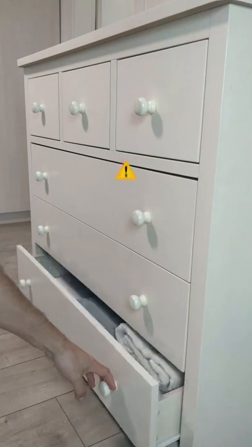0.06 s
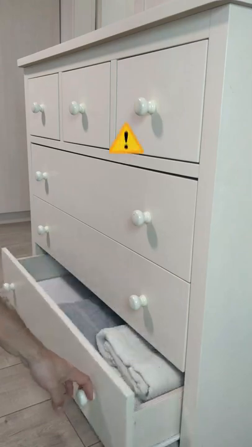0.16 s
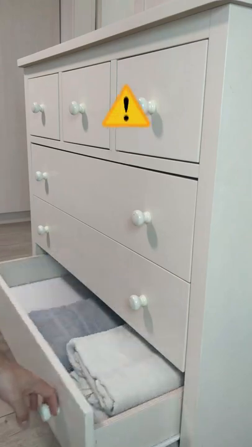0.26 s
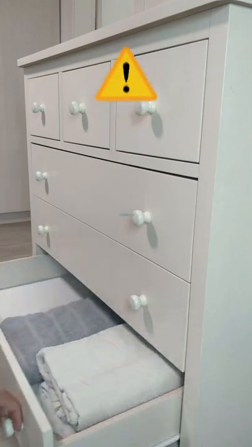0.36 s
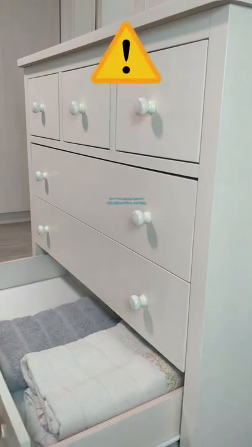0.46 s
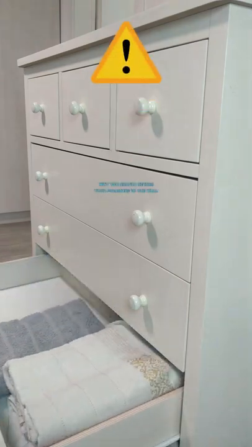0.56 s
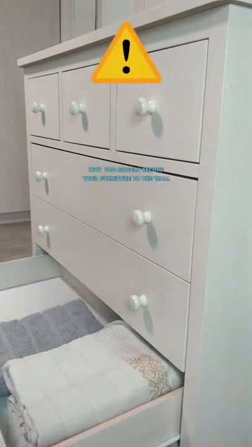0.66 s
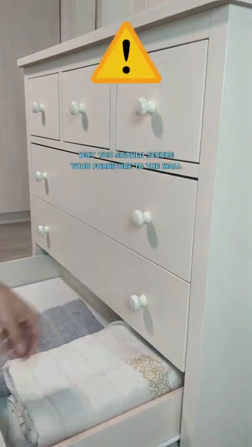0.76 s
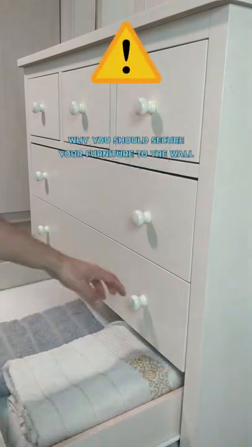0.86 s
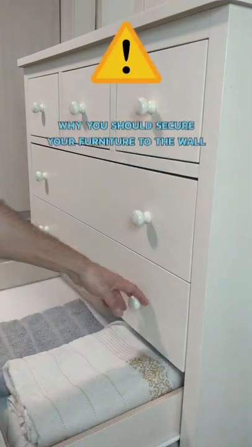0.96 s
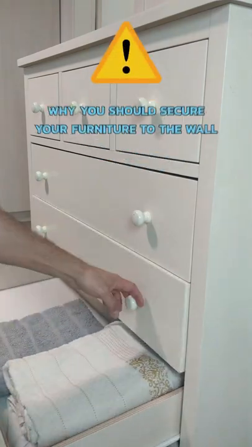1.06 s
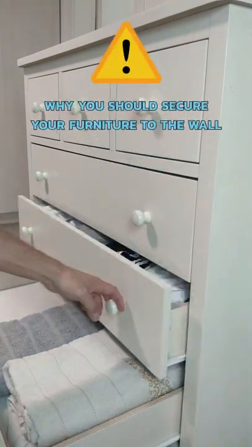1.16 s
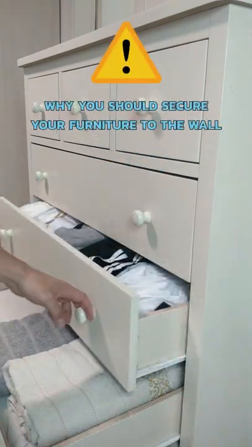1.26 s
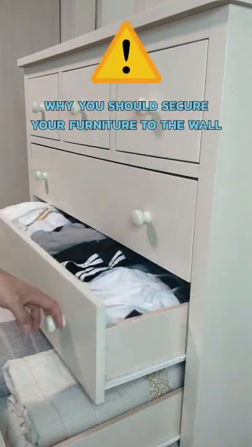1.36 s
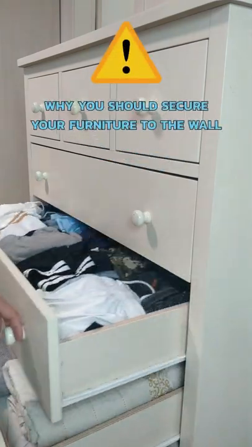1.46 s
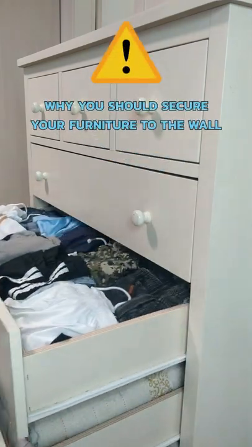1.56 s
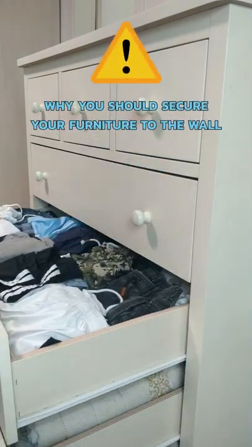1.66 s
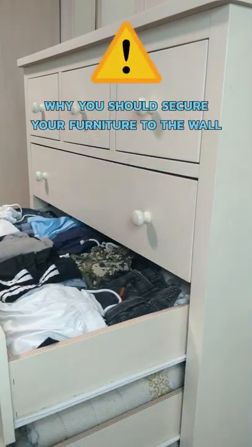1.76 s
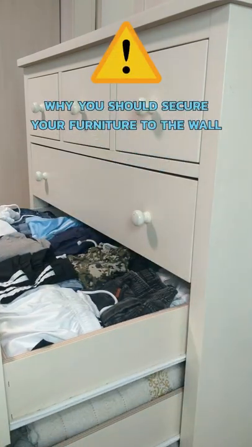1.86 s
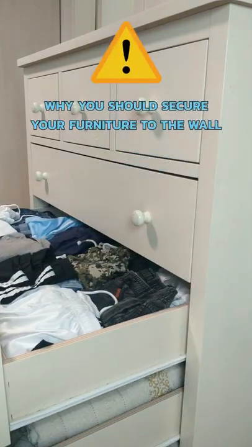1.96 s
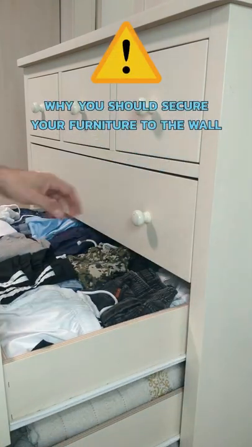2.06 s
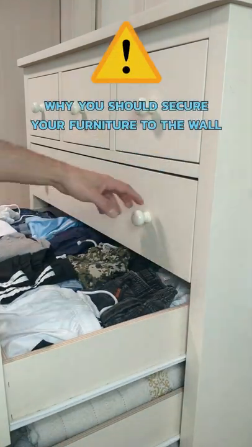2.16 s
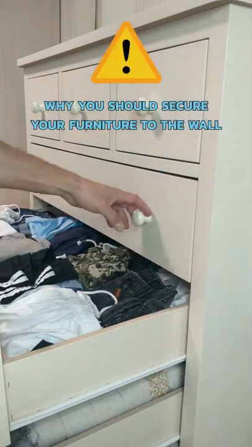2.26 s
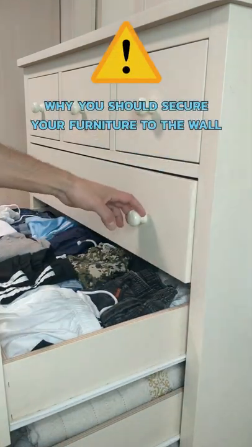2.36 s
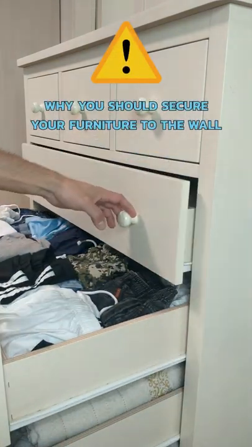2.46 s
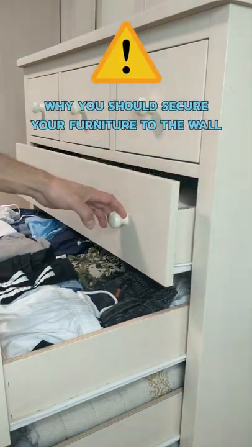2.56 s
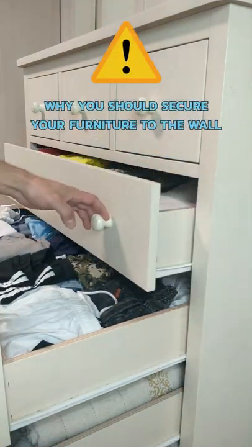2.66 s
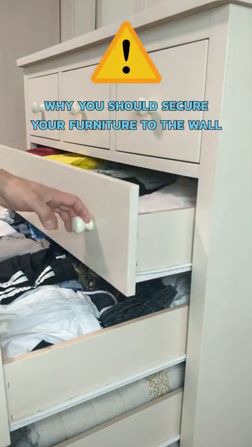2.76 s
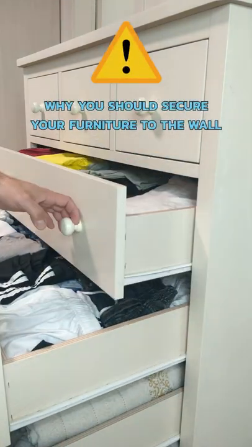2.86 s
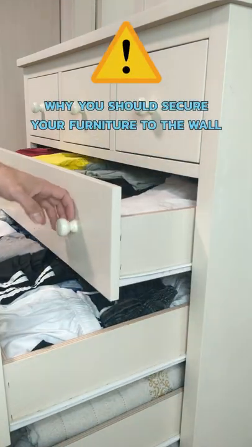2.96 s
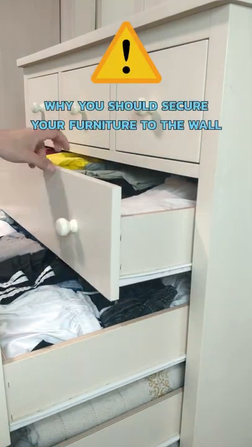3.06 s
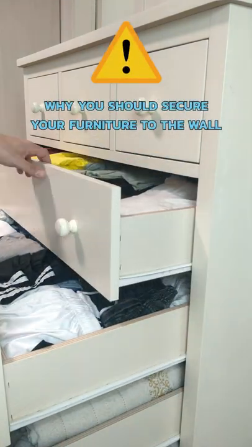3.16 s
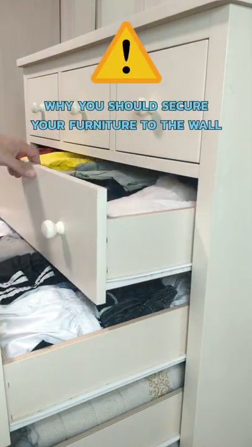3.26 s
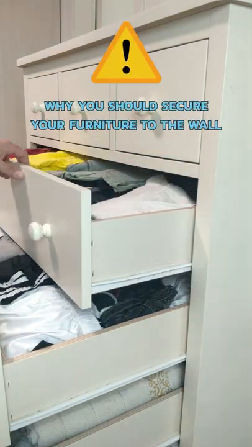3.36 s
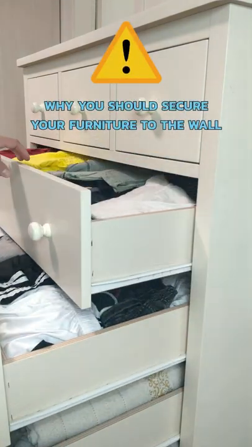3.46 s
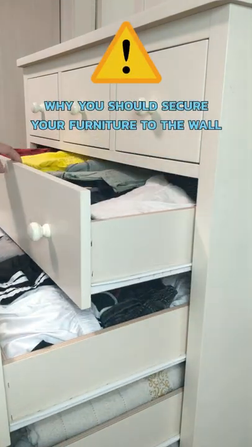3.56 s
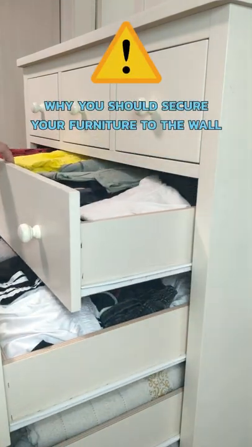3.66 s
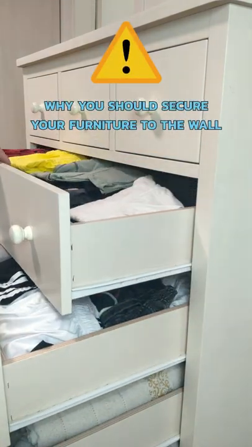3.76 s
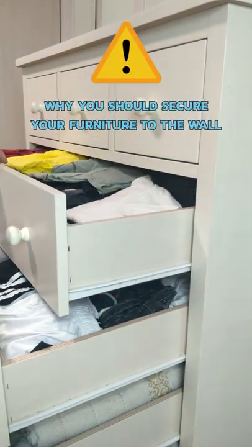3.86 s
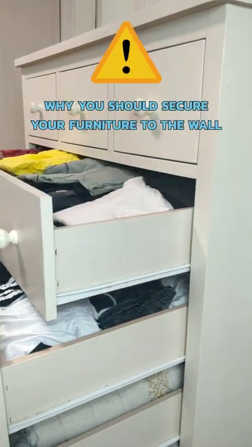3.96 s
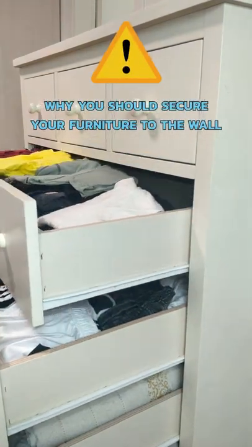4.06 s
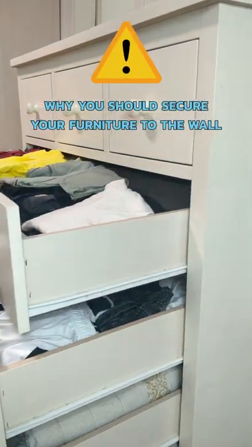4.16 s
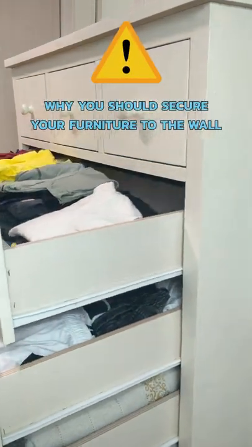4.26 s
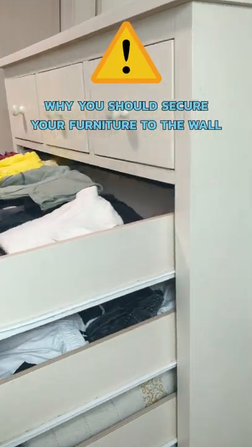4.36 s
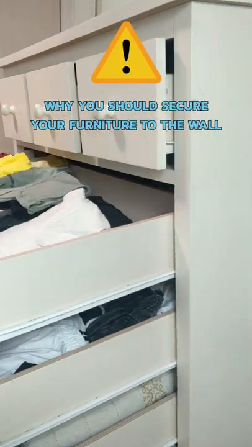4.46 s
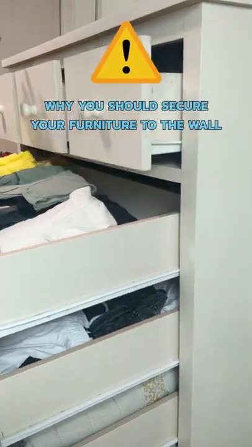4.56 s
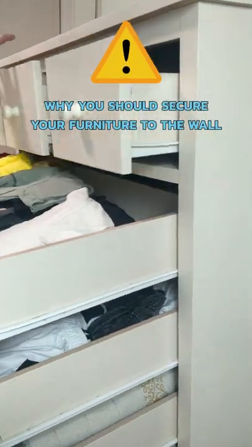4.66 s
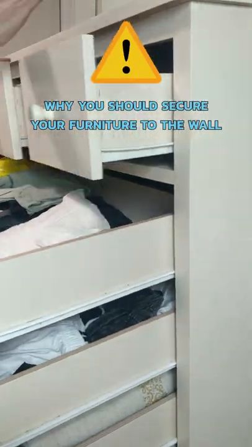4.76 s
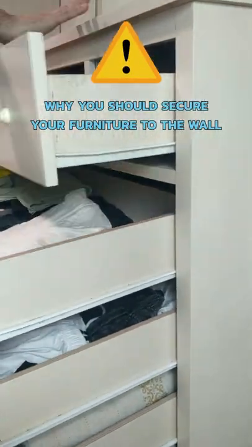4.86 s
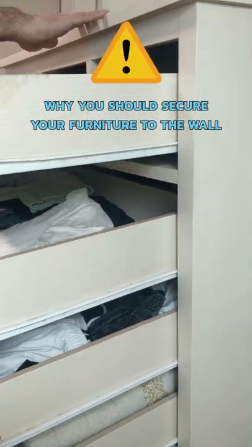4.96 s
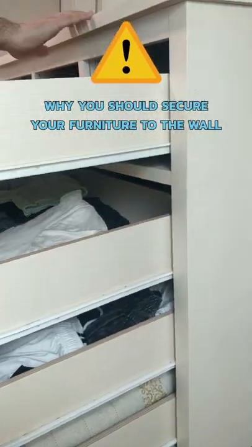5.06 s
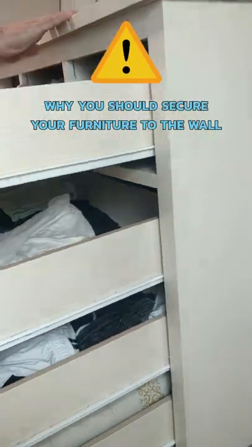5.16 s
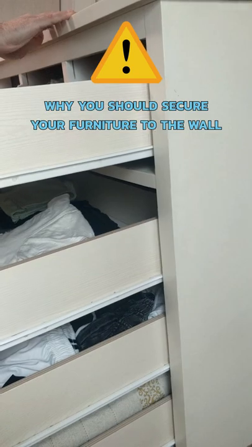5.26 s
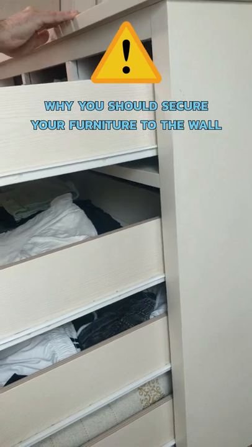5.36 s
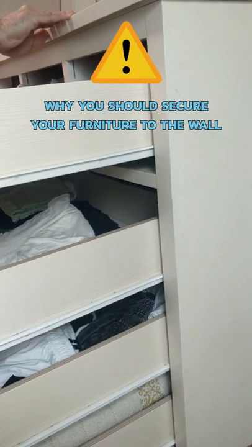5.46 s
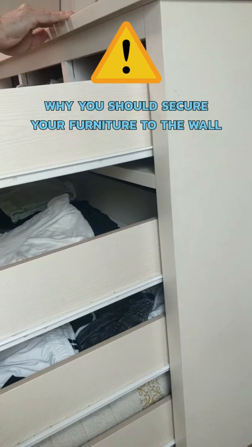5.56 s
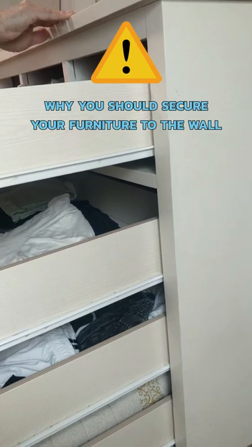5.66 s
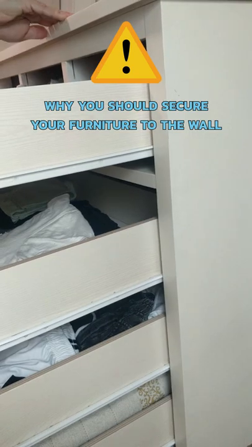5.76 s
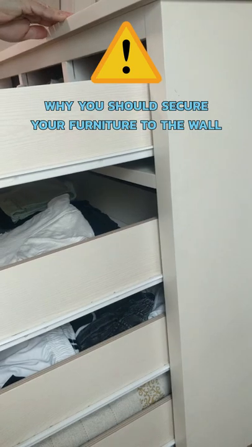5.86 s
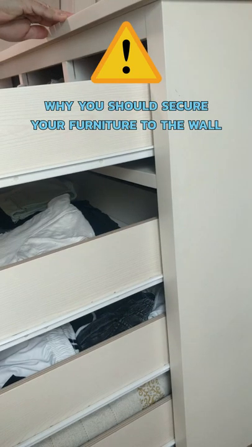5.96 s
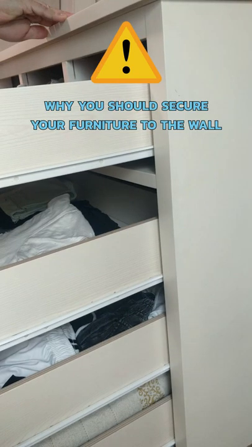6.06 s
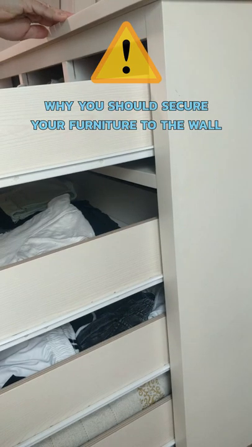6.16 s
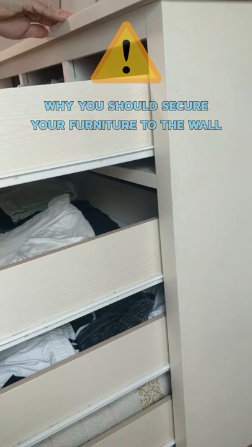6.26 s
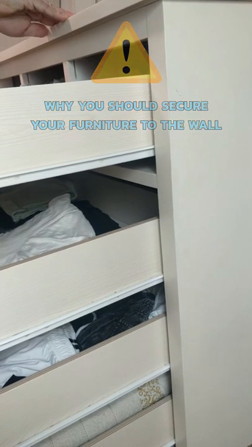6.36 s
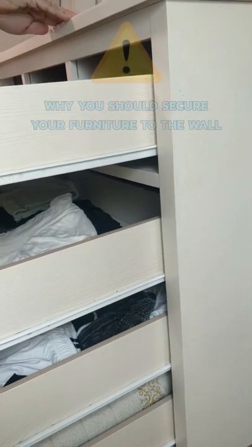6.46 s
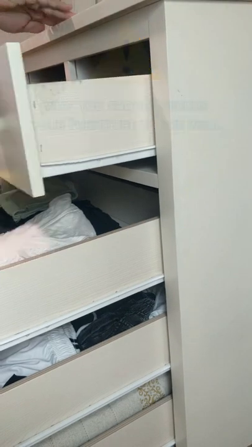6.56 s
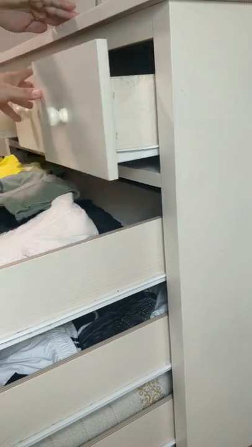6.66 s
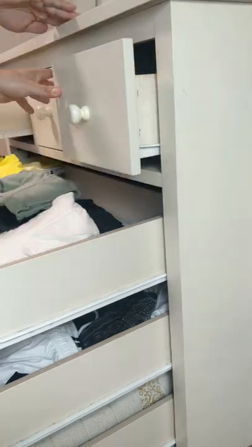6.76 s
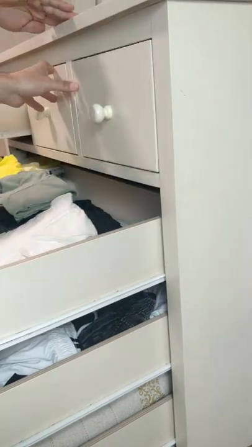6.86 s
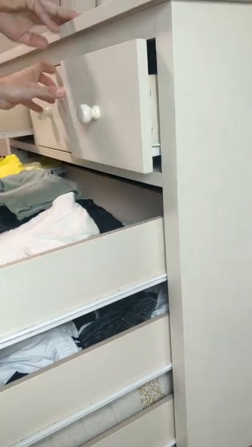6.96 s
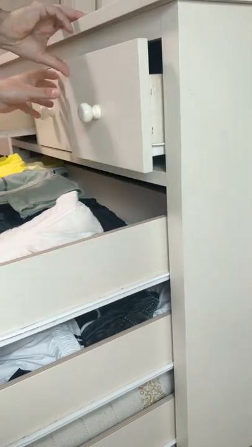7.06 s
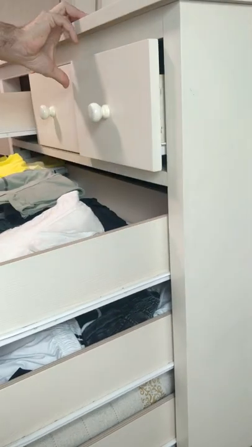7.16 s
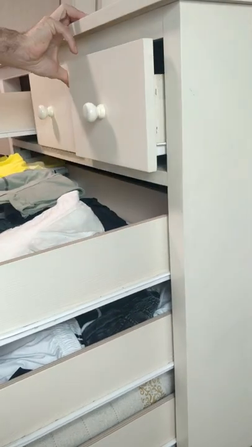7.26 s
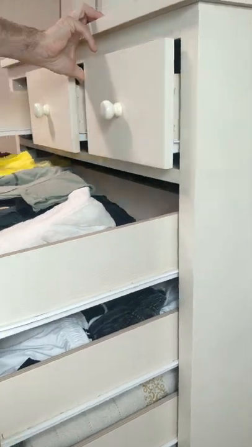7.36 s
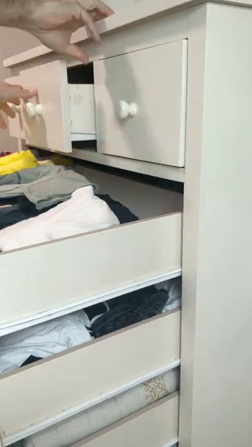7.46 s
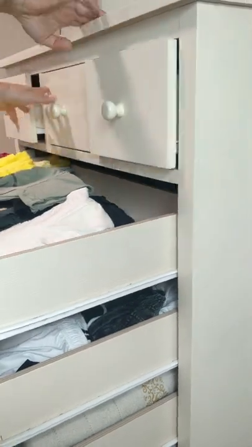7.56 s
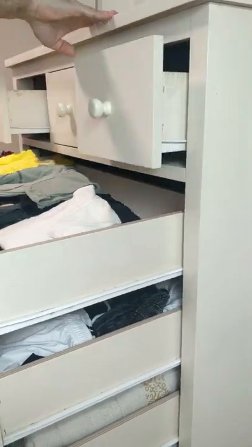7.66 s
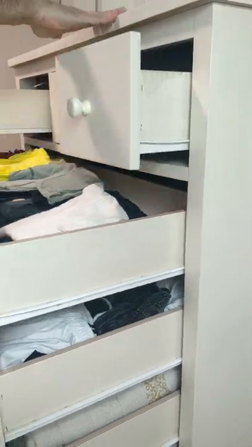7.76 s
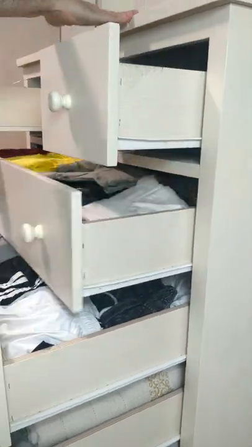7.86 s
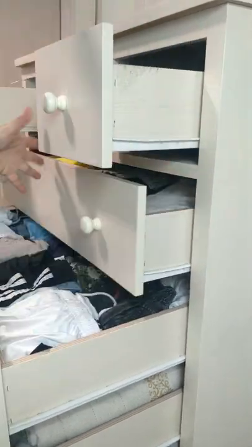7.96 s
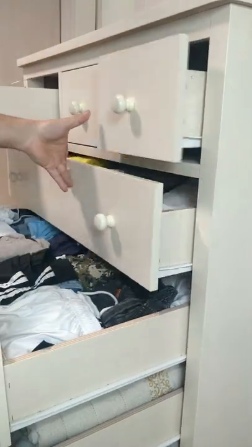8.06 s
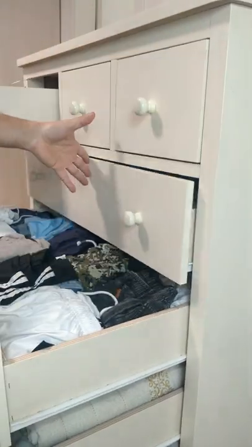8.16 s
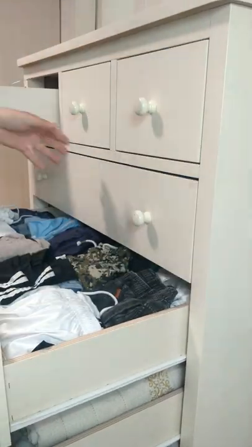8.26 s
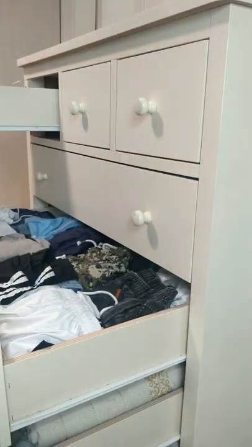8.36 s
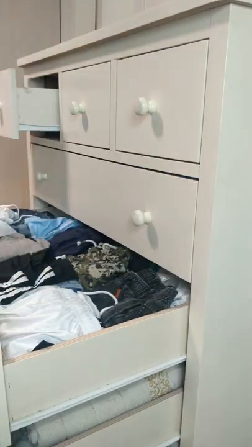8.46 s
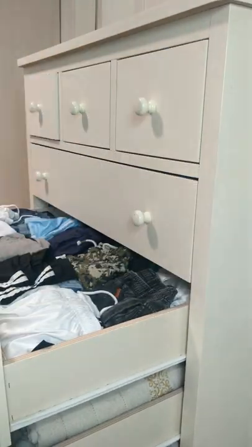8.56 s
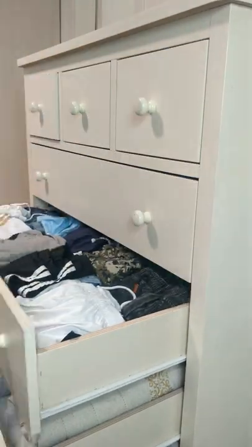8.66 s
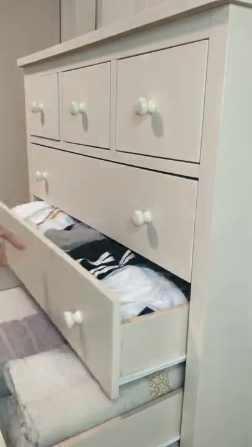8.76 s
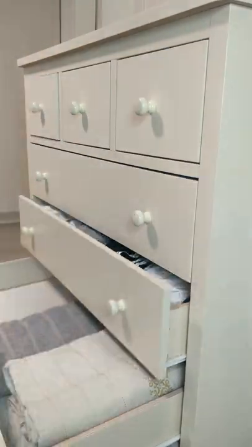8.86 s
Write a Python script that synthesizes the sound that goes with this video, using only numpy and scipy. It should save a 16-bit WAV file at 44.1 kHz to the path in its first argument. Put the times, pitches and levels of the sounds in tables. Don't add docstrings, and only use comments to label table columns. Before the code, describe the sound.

Close stereo microphones in a small, quiet room. Wide loaded wooden drawers roll out on metal runners with low bumpy rumbles, each ending in a dull knock and rattle. Light handling taps and tiny frame creaks fill the pauses. After a loud double knock midway, small drawers slide faster and brighter, hitting in a cluster of hard cracks near the end.

```python
import sys
import numpy as np
from scipy import signal
from scipy.fft import rfft, irfft
from scipy.io import wavfile
from scipy.ndimage import uniform_filter1d, map_coordinates

SR = 44100
rng = np.random.default_rng(int(sys.argv[2]) if len(sys.argv) > 2 else 0)


def amplitude_ratio(level_db):
    exponent = np.asarray(level_db, float) / 20
    return 10 ** exponent


def store_pcm(level_fs):
    pcm = np.round(np.clip(level_fs, -1, 1) * 32767).astype(np.int16)
    wavfile.write(sys.argv[1], SR, np.atleast_2d(pcm).T)


N = 392490

# pitch in Hz, width in Hz, level in dB.
WIDE_MODES = [
    [(165.2, 33, -3.5), (214.6, 8.3, -4.5), (248, 30.8, 3), (318, 76, -5)],
    [(438, 68, 9.5), (510, 320, 4), (683, 73, 5.5), (795, 86, -0.5)],
    [(1200, 590, 7.5), (1600, 230, -7.5), (2280, 450, -21.5)],
]
# pitch in Hz, width in Hz, level in dB.
SMALL_MODES = [
    [(150, 65, 3), (264, 46, 1), (273, 24.6, 8), (364.5, 12, 2.5)],
    [(427, 29.6, 5.2), (490, 31, 10.4), (610, 63, 2.5), (810, 72, 4.4)],
    [(1026, 77, -6.5), (1400, 200, 2), (1910, 360, -8), (2410, 360, -4.5)],
]
# pitch in Hz, level in dB per Hz.
HISS_COLOUR = [(880, -31.5), (1500, -12.5), (2200, -9.5), (3180, -14.5), (3660, -8.5), (6360, -11),
               (8770, -14), (13600, -21), (16000, -24.5), (16500, -42.5)]
# pitch in Hz, level in dB, time to fall 60 dB in seconds.
THUMP_MODES = [(145, -8.5, 0.09), (200, -7.5, 0.037), (262, 3.5, 0.076), (324.4, 11.5, 0.06),
               (378, 4.5, 0.16), (437, 14, 0.051)]
# lowest Hz, highest Hz, how many, cycles of ring.
CLACK_MODES = (450, 1800, 22, 26)
# pitch in Hz, level in dB, time to fall 60 dB in seconds.
CRACK_BANDS = [(1620, -4, 0.046), (2550, -1, 0.075), (3410, -3, 0.066), (5754, -4.5, 0.068),
               (7870, -7, 0.078), (10800, -11.5, 0.061), (15230, -11.5, 0.026)]
# time in seconds, rocking in dB, back board in dB.
HUMS = [(.588, -44.5, -49.5), (1.854, -46.5, -53), (2.765, -41, -46), (4.461, -46, -52), (5.096, -47, -43),
        (7.525, -51, -32), (7.881, -48, -30.5), (8.069, -49, -35), (8.137, -52, -35.5), (8.229, -45.5, -36),
        (8.579, -53, -35.5)]
# time in seconds, peak in dB, left over right in dB.
TICKS = [(0.1792, -19.5, 5), (0.27, -21.5, 3), (2.833, -37, 6), (2.8556, -40.5, 12), (2.917, -35, 9),
         (2.939, -44, -2), (3.0921, -38, 1), (3.2025, -33.5, 11), (3.28, -39, 10), (3.601, -39.5, 15),
         (3.6343, -44, 6), (3.7368, -42, 9), (3.763, -41.5, 3), (3.8278, -38, 7), (4.007, -37.5, 8),
         (4.056, -37, 3), (4.0908, -36.5, -1.0), (4.143, -36.5, 4), (4.1577, -39, 0), (4.2405, -35.5, 4),
         (4.2594, -46, -8), (4.3976, -34.5, -4), (5.421, -44, 5), (5.5872, -49, 11), (6.443, -37.5, 6),
         (6.5787, -39, 16.5), (7.733, -27, -2), (7.782, -40, 7.5), (7.956, -19.5, 6), (8.7879, -23.5, 0)]
# pitch in Hz, level in dB.
AIR_COLOUR = [(12, -68), (20, -13), (75, -1), (139, -13.5), (212, -3.5), (332, -22), (599, -17.5),
              (750, -22), (2120, -32.5), (2370, -32.5), (13900, -37.5), (15200, -38), (16500, -67)]
# time in seconds, left lag in samples, left over right in dB.
PLACE = [(0, -0.35, 2), (1.8, 2, 2), (2.2, -1, 2), (4.4, -2.5, 1.3), (8.9, -1.37, 0)]
# time in seconds, peak in dB, factor on dying time, ring in Hz.
CRACKS = [(0.5848, -20.5, 1.6, 1310), (1.026, -41.5, 2.5, 3520), (1.8542, -32, 0.58, 1660),
          (2.3006, -37, 0.16, 1470), (4.4617, -26, 1.7, 1380), (5.0957, -16.5, 1.2, 1450),
          (5.1725, -24, 1.3, 1360), (6.769, -22.5, 0.31, 2550), (6.8791, -34, 0.62, 1400),
          (7.2947, -34.5, 5.7, 1470), (7.5218, -16.5, 1.5, 1600), (7.59, -21.5, 1.13, 1450),
          (7.8741, -28.5, 3.6, 1660), (8.015, -16, 0.54, 1350), (8.1334, -5, 0.85, 2560),
          (8.2283, -17.5, 0.46, 1360), (8.4108, -44, 3, 1400), (8.4377, -31.5, 3.3, 1380),
          (8.5758, -12, 1.04, 1490)]
# start in seconds, length in seconds, level in dB,
# first pitch in Hz, last pitch in Hz.
HOLLOW = [
    (4.699, .38, -32, 280.3, 630),
    (6.469, .4, -37.5, 1000, 327.7),
]
# start in seconds, length in seconds,
# moment of top speed as share of the stroke (0-1), top speed in dB, load on the front panel in dB.
WIDE_STROKES = [(-.08, 0.69, 0.52, -46, 11), (1.05, 0.64, 0.45, -49, 20.5), (2.27, 0.71, 0.6, -60.5, 21),
                (3.04, 0.081, 0.9, -60.5, 6), (3.17, 0.11, 0.15, -69, 17.5), (3.25, .17, 0.23, -65.5, 18),
                (3.56, .3, 0.24, -76.5, 23), (3.9, 0.6, 0.1, -73.5, 20.5), (4.35, 0.32, 0.36, -55, 22),
                (4.46, 0.24, 0.26, -54.5, 28), (4.66, 0.44, 0.49, -47.5, 19.5),
                (5.2, 0.21, 0.25, -64.5, 12), (5.48, 0.45, 0, -86, 22.5)]
# start in seconds, length in seconds,
# moment of top speed as share of the stroke (0-1), top speed in dB, load on the front panel in dB.
SMALL_STROKES = [(6.36, 0.46, 0.53, -51, 7.2), (6.9, 0.14, 0.75, -70, 20.6), (7.27, .45, .5, -46.5, 9.4),
                 (7.6, 0.41, .55, -50, 14), (7.89, 0.33, 0.52, -45.5, 8.6), (8.24, 0.046, 0.061, -77, 36.5),
                 (8.41, 0.37, 0.24, -44, 1.8), (8.62, 0.3, 0.57, -48.5, 5.4)]
# dB over the speed on wide drawers, the same on small drawers,
# share of the load (0-1), power of the speed, lateness of the top (0-1), dB over a stop while shivering.
FOLLOW = [
    (-1, 2.5, 1, 0.57, 0.1, -21.5),
    (4.5, 14, 0.29, 1.34, 0.36, -14.5),
    (0, 8, 0.03, 2.6, 0, -31),
    (-0.5, -1.5, 0, 1.97, 0.05, -39),
]
# time in seconds, thump in dB, clack in dB, clack in Hz,
# rattle length in seconds.
STOPS = [(0.587, -16.5, -18, 740, 0.04), (1.852, -21, -24, 440, 0.028), (2.296, -32.5, -41.5, 1050, 0.026),
         (3.047, -41, -43.5, 870, 0.011), (4.461, -17.5, -22, 744, 0.039), (5.092, -8, -17.5, 534, 0.04),
         (5.167, -14.5, -12, 950, 0.03), (6.766, -10.5, -18, 490, 0.016), (7.105, -63, -48, 780, 0.022),
         (7.521, -5.5, -10, 550, 0.032), (7.593, -11.5, -11.5, 473, 0.023), (7.881, -14, -14, 490, 0.029),
         (8.06, -22, -24.5, 455, 0.023), (8.136, -9.5, -8.5, 553, 0.031), (8.225, -11, -15, 1410, 0.013),
         (8.413, -37.5, -40, 1360, 0.024), (8.433, -42, -33, 1340, 0.047), (8.574, -8.5, -8.5, 496, 0.028)]
# time in seconds, thump in dB, thump in
# # Hz, clack in dB.
FURTHER_KNOCKS = [(0.991, -40, 250, -58), (1.031, -27, 248, -42.5), (1.564, -27, 250, -36), (1.78, -52, 250, -51),
                  (2.265, -38.5, 150, -54), (3.192, -37, 156, -46.5), (4.358, -32.5, 150, -45),
                  (4.556, -18.5, 285, -35), (5.434, -34, 161, -38.5), (5.47, -26, 256, -39),
                  (6.147, -46, 165, -50), (6.356, -35.5, 128, -40.5), (6.439, -41, 266, -38),
                  (6.843, -28.5, 264, -32.5), (6.879, -34, 447, -29), (7.131, -31.5, 260, -44),
                  (7.301, -37, 273, -29), (8.017, -32, 450, -32)]

CHANGE_S = 6.2
SLAM_DB = -22


def in_time(rows):
    s, *columns = np.transpose(rows)
    return [np.interp(np.arange(N) / SR, s, column) for column in columns]


def rms_one(x):
    return x / np.sqrt(np.mean(x ** 2) + 1e-20)


def coloured(x, points):
    hz, level = np.transpose(points)
    grid = np.arange(N // 2 + 1) * SR / N + 1
    curve_db = np.interp(np.log(grid), np.log(hz), level, left=-60, right=-80)
    return rms_one(irfft(rfft(x) * amplitude_ratio(curve_db), N))


def high_pass(x, order, hz):
    return signal.sosfilt(signal.butter(order, hz, "high", fs=SR, output="sos"), x)


def low_pass(x, order, hz):
    return signal.sosfilt(signal.butter(order, hz, fs=SR, output="sos"), x)


def drift(rate):
    r = np.exp(-80 * np.pi * rate / SR)
    slow = signal.lfilter([1], [1, -2 * r, r * r], rng.standard_normal(N // 40 + 2002))[2000:]
    return np.interp(np.arange(N) / 40, np.arange(len(slow)), rms_one(slow))


def resonate(x, hz, width):
    r = np.exp(-np.pi * width / SR)
    top = np.array([1, 0, -1]) * (1 - r * r) / 2
    return signal.lfilter(top, [1, -2 * r * np.cos(2 * np.pi * hz / SR), r * r], x)


def ring(clicks, hz, t60):
    r, w = amplitude_ratio(-60 / (t60 * SR)), 2 * np.pi * hz / SR
    return signal.lfilter([0, np.sin(w)], [1, -2 * r * np.cos(w), r * r], clicks + 1e-18)


def swell(start, length, top):
    slams = [row[0] for row in STOPS if row[1] > SLAM_DB and row[0] > start + .1]
    end = min([start + length, N / SR] + slams)
    at = np.arange(max(round(start * SR), 0), round(end * SR))
    done = (at / SR - start) / length
    top = np.clip(top, .05, .97)
    slope = np.minimum(done / top, (1 - done) / (1 - top))
    return at, np.sin(np.pi / 2 * np.clip(slope, 0, 1))


def shaking():
    gains, age = np.zeros((4, N + SR)), np.arange(SR // 2) / SR
    wide_db, small_db, share, power, late, shiver_db = np.transpose(FOLLOW)[:, :, None]
    for strokes, over_db in ((WIDE_STROKES, wide_db), (SMALL_STROKES, small_db)):
        for start, length, top, speed_db, load_db in strokes:
            at, speed = swell(start, length, top + late * (1 - top))
            gains[:, at] += amplitude_ratio(speed_db + over_db + share * load_db) * speed ** power
    shiver = amplitude_ratio(-60 * age / 0.29) * (1 - np.exp(-age / 0.02))
    for s, thump_db, clack_db, clack_hz, rattle_s in STOPS:
        stop_db = np.array([[thump_db], [clack_db], [clack_db], [clack_db]])
        gains[:, round(s * SR):][:, :len(age)] += amplitude_ratio(stop_db + shiver_db) * shiver
    return gains[:, :N]


def grit(per_s, spread_db, lumpy_db):
    sizes = amplitude_ratio(spread_db * np.minimum(rng.exponential(1, N), 4)) * rng.choice([-1, 1], N)
    hits = rng.random(N) < per_s / SR
    return sizes * hits * amplitude_ratio(lumpy_db * drift(16.0))


def air():
    mid, side, rumble = (coloured(rng.standard_normal(N), AIR_COLOUR) for layer in range(3))
    side = high_pass(side, 1, 1500)
    rumble = low_pass(rumble, 2, 110)
    return amplitude_ratio(-60.5) * (mid + 1.4 * side * [[1], [-1]]) + amplitude_ratio(-53 + 0.83 * drift(3)) * rumble


def shaken_panel(bumps, modes):
    out = 0
    for k, (hz, width, db) in enumerate(modes):
        gain = (-1) ** k * amplitude_ratio(db + 2.8 * drift(5.7)) / np.sqrt(width)
        out = out + gain * resonate(bumps, hz, width)
    return rms_one(out)


def rolling():
    *panels, hiss = shaking()
    is_small, out = np.arange(N) > CHANGE_S * SR, 0
    for gain, wide_modes, small_modes in zip(panels, WIDE_MODES, SMALL_MODES):
        bumps = grit(1400, 2.8, 1.3)
        wide = shaken_panel(bumps, wide_modes)
        small = shaken_panel(bumps, small_modes)
        out = out + gain * np.where(is_small, small, wide)
    return out + hiss * coloured(grit(9000, 3.8, 0.72), HISS_COLOUR)


def far_runner():
    hiss = coloured(grit(9000, 2.6, 0.58), HISS_COLOUR)
    return amplitude_ratio(-4.5) * shaking()[-1] * high_pass(hiss, 1, 2500) * [[1], [-1]]


def creaks():
    out, age = np.zeros((2, N + 2000)), np.arange(2000) / SR
    for s, peak_db, pan_db in TICKS:
        fade = np.exp(-age / 0.0017) + 0.38 * np.exp(-age / 0.0071)
        snap = high_pass(rng.standard_normal(2000) * fade, 2, 2500)
        at = round(s * SR)
        sides = amplitude_ratio(np.array([[pan_db / 2], [-pan_db / 2]]))
        out[:, at:at + 2000] += amplitude_ratio(peak_db - 3) * snap / np.abs(snap).max() * sides
    return out[:, :N]


def cracks():
    out, size = np.zeros(N + 9000), 9000
    age = np.arange(size) / SR
    bands = [signal.butter(2, [hz / 1.245, min(hz * 1.23, 17000)], "band", fs=SR, output="sos")
             for hz, level, t60 in CRACK_BANDS]
    for s, peak_db, linger, ring_hz in CRACKS:
        lumps = uniform_filter1d(rng.random(size) < 600 / SR, size=20, output=float)
        splinters = rng.standard_normal(size) * (0.6 + lumps * 12)
        chance, part = rng.standard_normal(len(CRACK_BANDS)), 0
        for band, (hz, level, t60), a in zip(bands, CRACK_BANDS, chance):
            fade = amplitude_ratio(-60 * age / (t60 * max(linger, .2))) + 1.6 * np.exp(-age / 0.00031)
            part = part + amplitude_ratio(level + 2 * a) * signal.sosfilt(band, splinters * fade)
        part = part + 3.25 * resonate(part * np.exp(-age / 0.025), ring_hz, 160)
        out[round(s * SR):][:size] += amplitude_ratio(peak_db + 4.0) * part / np.abs(part).max()
    return out[:N]


def blows():
    stops = [(s, thump_db, 294, clack_db, hz, rattle_s) for s, thump_db, clack_db, hz, rattle_s in STOPS]
    further = [(s, thump_db, hz, clack_db, 536, .022) for s, thump_db, hz, clack_db in FURTHER_KNOCKS]
    return sorted(stops + further)


def knocks():
    out, size = np.zeros(N + 9000), 9000
    age = np.arange(size) / SR
    low, high, count, cycles = CLACK_MODES
    clack = [(hz, 0, cycles / hz) for hz in np.geomspace(low, high, count)]
    for s, thump_db, thump_hz, clack_db, clack_hz, rattle_s in blows():
        contacts = rng.standard_normal(size) * (rng.random(size) < 1500 / SR)
        contacts[0] = 2.16
        for modes, db, centre_hz, slope_db, linger in (
                (THUMP_MODES, thump_db - 2.0, thump_hz, 9, 1.5),
                (clack, clack_db + 7.5, clack_hz, 8, 1.1)):
            push = contacts * np.exp(-(age / (max(rattle_s, .002) * linger)) ** 2)
            push = low_pass(push, 2, modes[-1][0] * 1.7)
            chance, part = rng.standard_normal((len(modes), 2)), 0
            for (hz, level, t60), (a, b) in zip(modes, chance):
                mode_db = level + 2.5 * a - slope_db * abs(np.log2(hz / centre_hz))
                part = part + amplitude_ratio(mode_db) * ring(push, hz * (1 + 0.041 * b), t60)
            out[round(s * SR):][:size] += amplitude_ratio(db) * part / np.abs(part).max()
    return out[:N]


def carcass():
    s, rock_db, board_db = np.transpose(HUMS)
    out = 0
    for db, hz, t60, swing_hz in ((rock_db, 39.8, 1.28, 15), (board_db, 71.65, 1.1, 24)):
        push = np.zeros(N)
        push[(s * SR).astype(int)] = amplitude_ratio(db + 6)
        out = out + ring(resonate(push, hz, swing_hz), hz, t60)
    return out


def hollow():
    gain, glide = np.zeros(N), []
    for start, length, db, first_hz, last_hz in HOLLOW:
        at, speed = swell(start, length, .55)
        gain[at] = amplitude_ratio(db) * speed
        glide += [(start, first_hz), (start + length, last_hz)]
    hz, = in_time(glide)
    sway = low_pass(rng.standard_normal((2, N)), 2, 60)
    turning = np.exp(2j * np.pi * np.cumsum(hz) / SR)
    return gain * rms_one(np.real((sway[0] + 1j * sway[1]) * turning))


def placed(x):
    lag, pan_db = in_time(PLACE)
    low = signal.sosfiltfilt(signal.butter(2, 7000, fs=SR, output="sos"), x)
    pair = np.array([amplitude_ratio(way * pan_db / 2) * map_coordinates(low, [np.arange(N) - way * lag / 2], order=3)
                     for way in (1, -1)])
    scatter = rng.standard_normal(600) * np.exp(-np.arange(600) / 150)
    bright = high_pass(x, 1, 4000)
    side = signal.fftconvolve(bright, scatter / np.linalg.norm(scatter))[:N]
    return pair + (x - low) * amplitude_ratio(np.array([[-1.], [1.]])) + side * [[1], [-1]]


def room(x):
    age = np.arange(20000) / SR
    fade = amplitude_ratio(-60 * age / 0.15) * (1 - np.exp(-age / 0.0004))
    mid, side = rng.standard_normal((2, 20000)) * fade
    side = .15 * side + amplitude_ratio(2) * high_pass(side, 1, 3000)
    echo = amplitude_ratio(-10) / np.sqrt(np.sum(mid ** 2)) * (mid + side * [[1], [-1]])
    return signal.fftconvolve(x[None], echo, axes=1)[:, :N]


def scene():
    body = rolling() + hollow() + knocks() + cracks()
    wide, small = high_pass(body, 3, 100), high_pass(body, 3, 192)
    chest = np.where(np.arange(N) > CHANGE_S * SR, small, wide)
    ticks = creaks()
    near = placed(chest) + far_runner() + carcass() + ticks
    return near + room(chest + ticks.mean(axis=0)) + air()


def top_cut(x):
    return signal.sosfilt(signal.butter(12, 16980, fs=SR, output="sos"), x)


def record(dry):
    held = 1.08 * np.tanh(dry / 1.08)
    held = signal.sosfilt(signal.cheby2(14, 36, 16050, fs=SR, output="sos"), held)
    return top_cut(held)


dry = scene()
out = record(dry)
store_pcm(out)
```